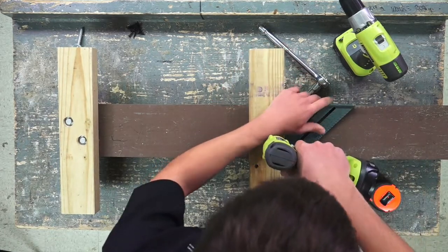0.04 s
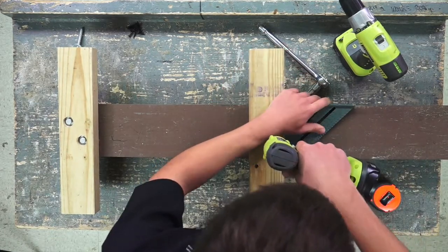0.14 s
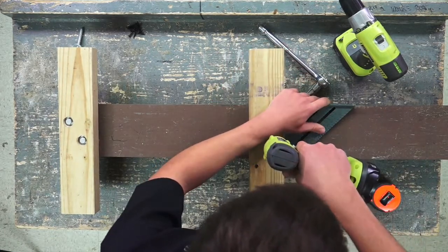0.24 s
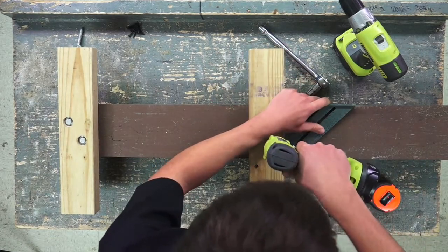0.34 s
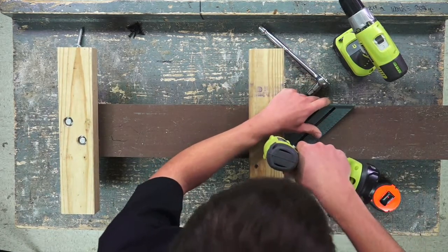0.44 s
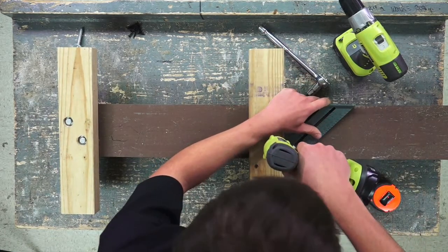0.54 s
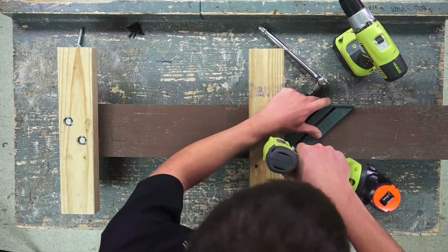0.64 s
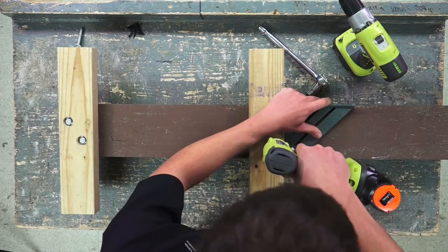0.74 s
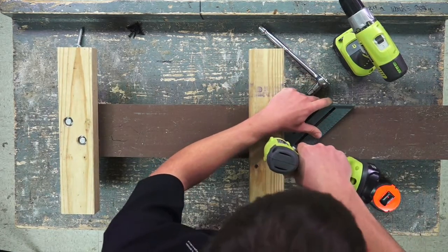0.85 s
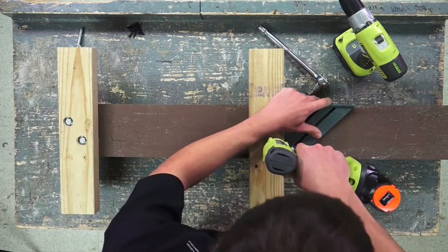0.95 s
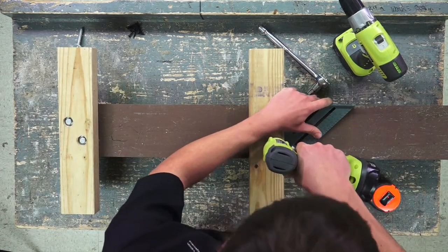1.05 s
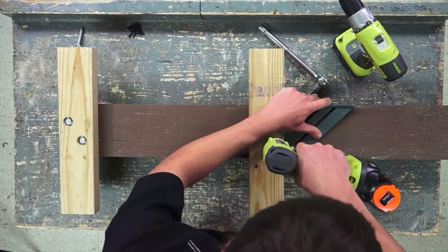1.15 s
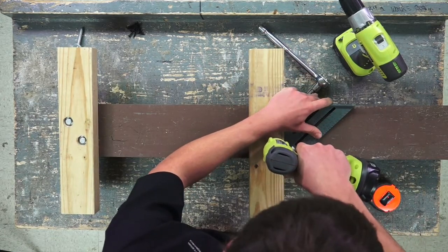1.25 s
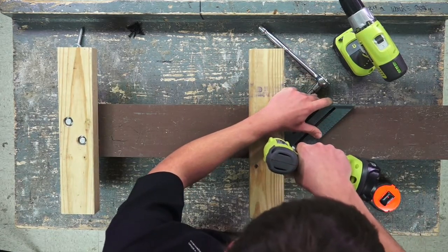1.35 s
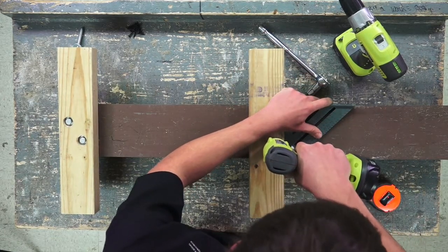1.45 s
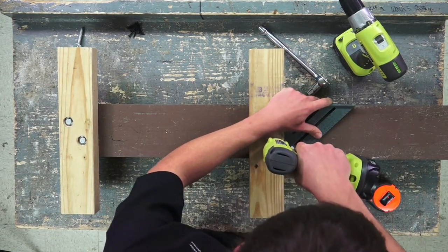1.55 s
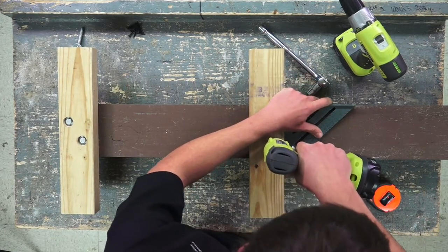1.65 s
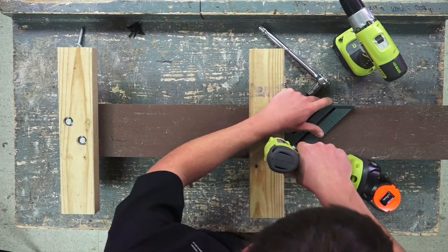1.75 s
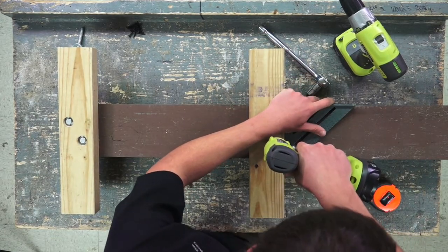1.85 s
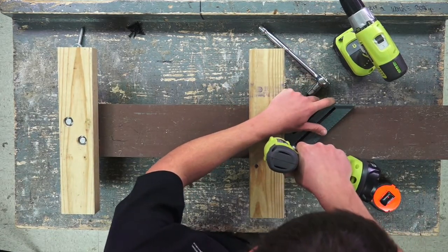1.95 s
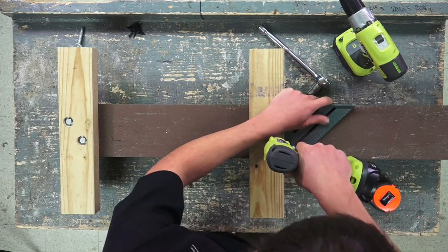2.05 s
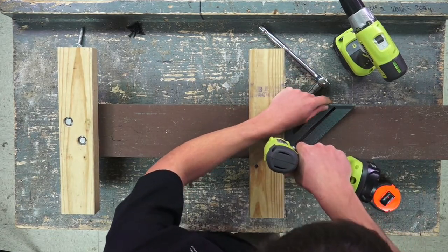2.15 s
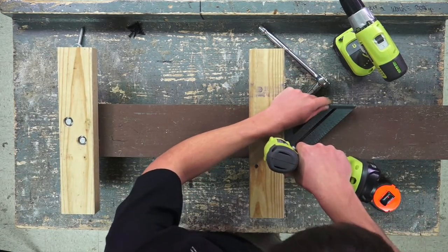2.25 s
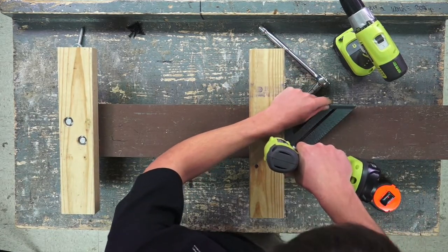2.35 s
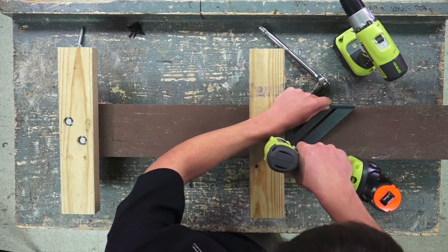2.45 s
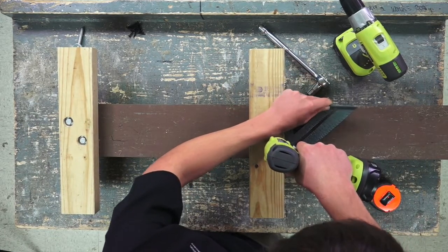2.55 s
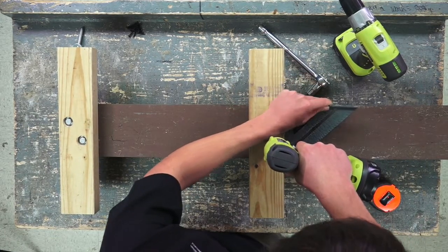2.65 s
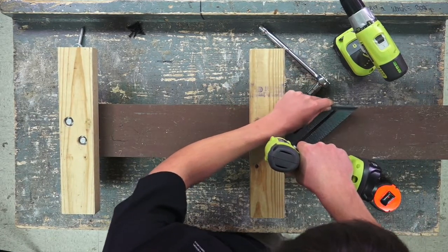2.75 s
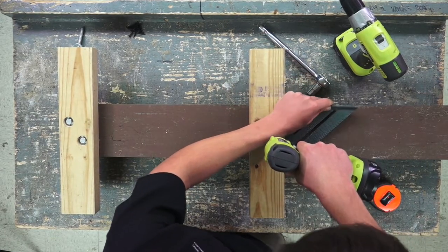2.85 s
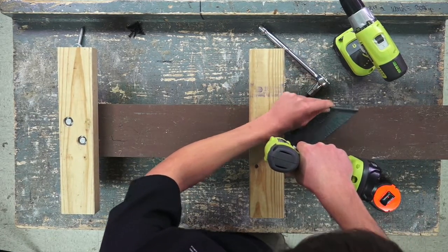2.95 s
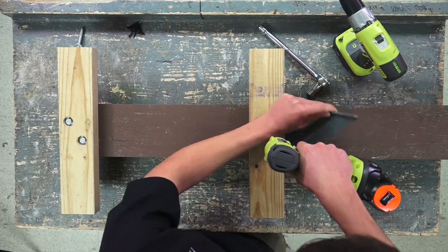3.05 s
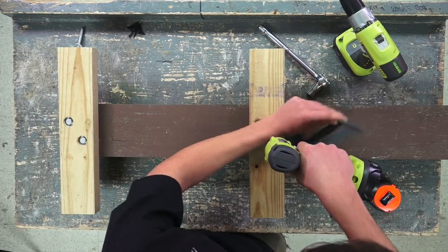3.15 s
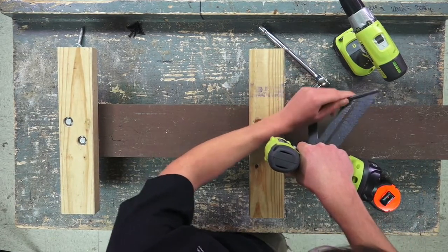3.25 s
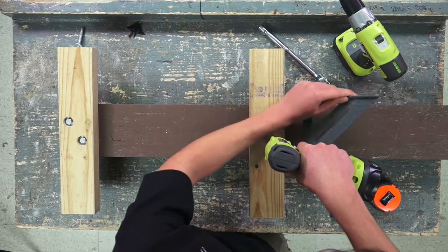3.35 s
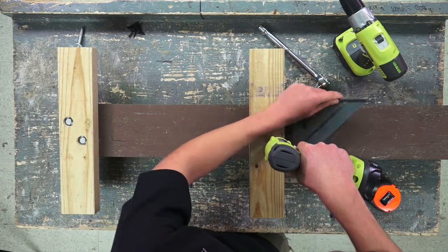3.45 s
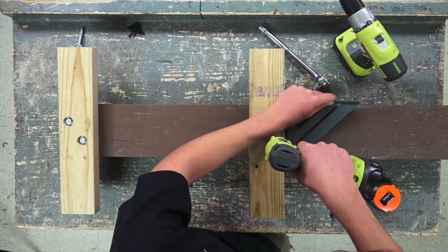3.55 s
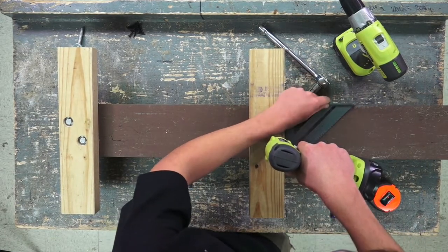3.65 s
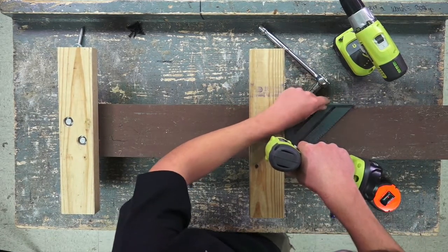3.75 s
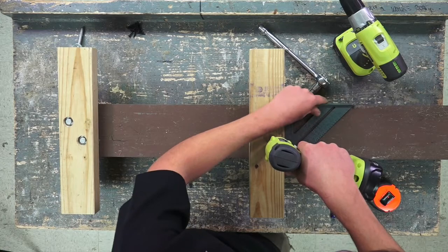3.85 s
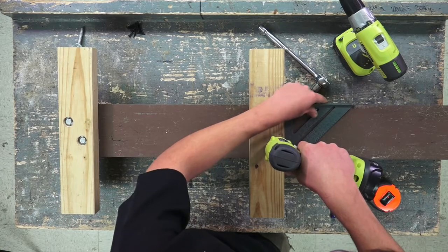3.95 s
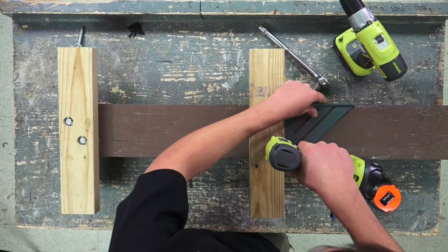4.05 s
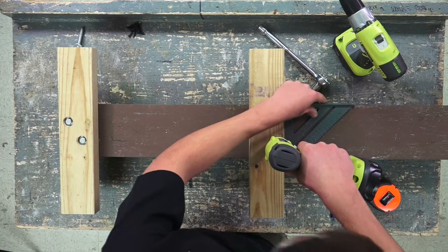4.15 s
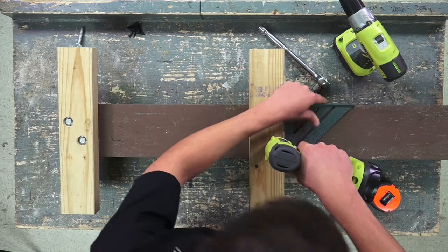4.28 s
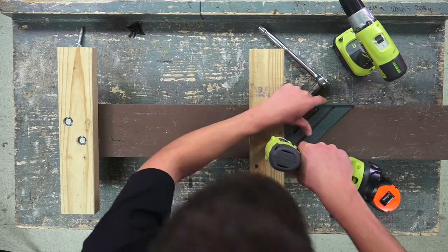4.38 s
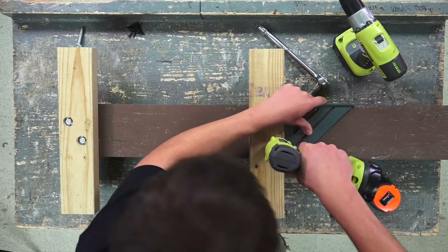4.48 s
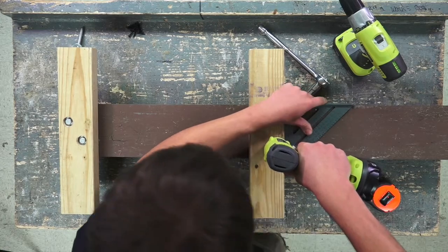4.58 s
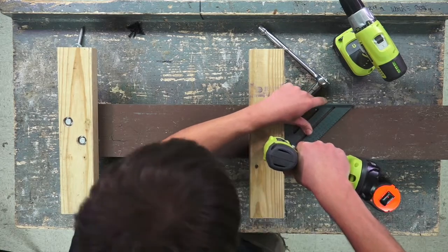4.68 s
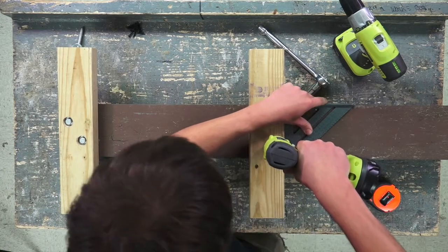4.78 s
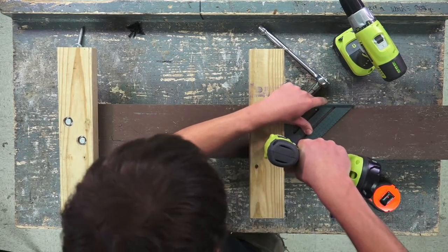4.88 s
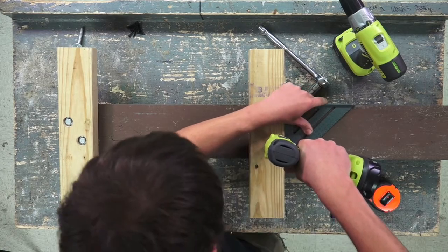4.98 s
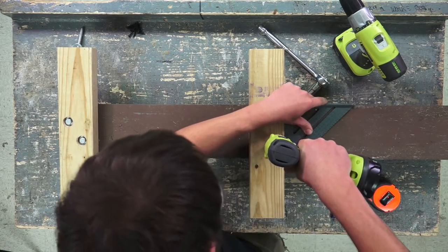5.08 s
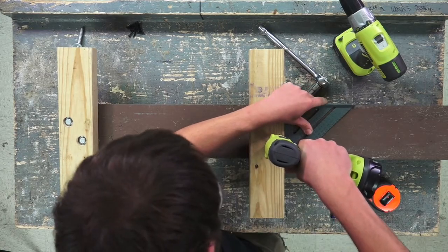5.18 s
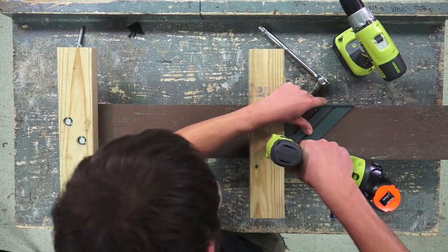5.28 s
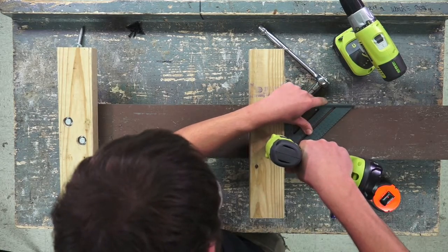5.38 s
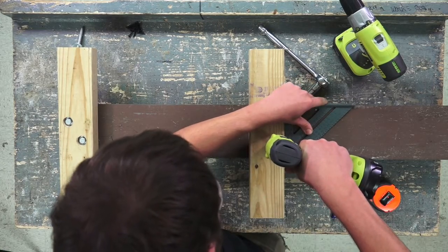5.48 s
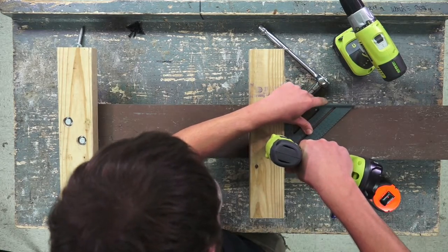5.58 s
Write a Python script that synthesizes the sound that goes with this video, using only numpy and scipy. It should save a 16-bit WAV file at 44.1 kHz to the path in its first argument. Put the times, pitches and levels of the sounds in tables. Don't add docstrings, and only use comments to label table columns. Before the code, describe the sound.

Two harsh, rapid impact-driver bursts on a workbench, separated by a quiet pause of soft sliding, light wood taps and a small metallic clink.

```python
import sys
import numpy as np
from scipy import signal
from scipy.fft import rfft, irfft, next_fast_len
from scipy.io import wavfile
from scipy.ndimage import uniform_filter1d

SR = 44100
rng = np.random.default_rng(int(sys.argv[2]) if len(sys.argv) > 2 else 0)


def boost_factor(decibels):
    exponent = np.asarray(decibels, float) / 20
    return 10 ** exponent


def log_audio(samples):
    frames = np.atleast_2d(samples).T
    limited = np.clip(frames, -1, 1)
    pcm = np.round(limited * 32767).astype(np.int16)
    wavfile.write(sys.argv[1], SR, pcm)


N = 247842

# time_s, blows_so_far
BLOW_COUNT = [
    [(.6934, 0), (.7712, 4), (.8263, 7), (1.0717, 20), (1.3586, 35), (1.554, 45), (1.712, 53), (1.7524, 55),
     (1.7749, 56)],
    [(4.5604, 0), (4.5808, 1), (4.887, 17), (4.9425, 20), (5.0187, 24), (5.3042, 39), (5.404, 44),
     (5.5227, 50), (5.6038, 54)],
]
# time_s, crack_peak_db, body_re_crack_db
SLOW_BLOWS = [
    (0.6596, -14.5, 2),
    (1.8061, -12, 3),
    (1.8338, -15, 14),
    (1.8613, -29, -9),
    (1.8823, -10, 8),
    (4.533, -16, 14.5),
]
# time_s, blow_force_db, bench_lean_db
EFFORT = [
    [(.66, -11, -6), (.71, 5.5, 9.5), (.78, -2.5, -5), (.95, 2.76, 5.5), (1.17, -1, 0.5), (1.3, -0.3, 5.5),
     (1.46, 3, -5), (1.76, 2.4, -2.5), (1.86, -1, 3.5)],
    [(4.53, -15, 2.5), (4.565, 6, 2.5), (4.63, -2.5, -4), (4.75, 2.3, -5), (4.87, -0.8, 2), (4.95, 0.5, 0),
     (5.2, -0.5, 2), (5.37, 1.5, -4), (5.62, 0.7, -5)],
]
# delay_s, crack_db, body_db
REBOUNDS = [
    (.002, -8, 1),
    (.0035, -15, 1),
    (.0085, -17, -8),
    (.0105, -14, -6),
    (.0132, -15, -3),
    (.0152, -11, -3),
    (.017, -16, -4),
]
# time_s, crack_peak_db, body_re_crack_db
LOOSE_CONTACTS = [(0.665, -19, -6), (0.6847, -7, 5), (0.6883, -26, 19), (0.7038, -19.5, 15.5),
                  (.708, -4, 4.5), (1.795, -16.5, 12.5), (1.843, -18, 11), (1.895, -25.5, 5),
                  (1.922, -20.5, 1), (1.937, -17.5, -2.5), (1.9497, -28.5, 4), (1.964, -31, 6),
                  (1.973, -42, 0), (4.5306, -30, 21.5), (4.542, -10.5, 11.5), (4.555, -7.5, 11)]
# freq_hz, density_db_per_hz
CRACK_SPECTRUM = [(1500, -34.5), (2500, -22.5), (3550, 6), (3900, -18), (4560, 2), (6100, -10), (7000, -6),
                  (9200, -9.5), (13500, -12.5), (15500, -12), (16500, -8.5)]
# freq_hz, density_db_per_hz
BODY_SPECTRUM = [(150, -44.5), (250, -17.5), (449, -23), (624, -16.5), (770, -14), (1070, -3), (1890, -6.5),
                 (2170, -6.5), (3500, -9.5), (3890, -10), (9000, -24.5), (11700, -44), (19800, -120)]
# freq_hz, width_hz, level_db
TOOL_MODES = [(630, 70, -10), (980, 80, -5), (1090, 65, 1.5), (1330, 110, -5), (1700, 120, -8),
              (2175, 85, 1.8), (2890, 100, -2), (3570, 110, 3), (4400, 150, -7), (4950, 350, -10),
              (5630, 120, -14), (6900, 250, -14), (9160, 300, -19)]
# freq_hz, width_hz, level_db
LEG_MODES = [
    (51.6, 20, -17),
    (108, 30, 1),
]
# freq_hz, width_hz, level_db
TOP_MODES = [(169.4, 35, 0), (197.3, 72, -2.5), (273.3, 40, -6), (299.5, 15, -11.5)]
# freq_hz, width_hz, level_db
BEAM_MODES = [(363.3, 12, -1), (412.5, 31, -20), (494.5, 8.6, -0.5), (664, 320, -6), (890, 370, -3.5),
              (930, 110, -0.5), (1090, 38, 2), (1370, 150, -4), (1590, 270, -19.5)]
# time_s, level_db
RUN = [
    [(.632, -70), (.645, -52), (.657, -41), (.68, -23.5), (.8, -27), (1.4, -21), (1.75, -18.5),
     (1.86, -26.5), (1.96, -44)],
    [(4.49, -68.5), (4.505, -48), (4.528, -31.5), (4.56, -22), (4.7, -21.5), (5.0, -17), (5.62, -18)],
]
# contact_s, step_up_s, whistle_end_s
TRIGGER = [
    (.588, .641, .659),
    (4.468, 4.498, 4.521),
]
# time_s, peak_db, thump_re_peak_db, ring_0_to_1
CLINKS = [
    (3.203, -51.5, -0.5, 0.6),
    (3.215, -38.5, -19, 0.43),
    (3.553, -29, -9.5, 0.3),
    (3.612, -32, -27, 0.45),
    (3.648, -46.5, -8, 0.8),
    (3.674, -51, -19, 1),
    (3.739, -57, -8, 0.6),
]
# freq_hz, level_db, t60_s
SQUARE_LAID = [(713, -7, 0.07), (1103, 9, 0.095), (1278, 2, .1), (1570, -4, 0.088), (1880, -3, .1),
               (2384, 0, 0.06), (3320, -8, 0.2), (3590, 1.5, 0.098), (4250, -2, 0.15), (4430, 2, .1),
               (4950, 7.5, 0.045), (5674, -3, 0.06), (6970, 1, 0.04), (9000, -9, 0.04)]
# freq_hz, level_db, t60_s
SQUARE_LIFTED = [(1028, -13, 0.6), (1352, 3, 0.049), (1610, -6, 0.17), (2300, -9.5, 0.12),
                 (2920, -7.5, 0.14), (3980, -14, 0.32), (4340, -5, 0.098), (5028, 1, 0.11), (5690, 0, 0.14),
                 (6800, -9, 0.086), (7140, -10, .12), (8000, -20, 0.086), (8662, -13, .08)]
# time_s, peak_db, pitch_hz
TAPS = [(0.105, -65, 1380), (0.296, -64, 851), (0.552, -63, 1110), (2.259, -53, 1237), (2.748, -63, 894),
        (3.037, -53.5, 1323), (3.171, -60.5, 797), (3.71, -56, 1050), (3.896, -60.5, 1145),
        (4.03, -49.5, 1243), (4.059, -58.5, 1023), (4.26, -61, 1030), (4.444, -55.5, 1090)]
# peak_s, rise_s, fall_s, hiss_db, scrape_db
STROKES = [(.01, .02, .07, -82, -80), (.11, .02, .04, -77, -83), (.346, 0.33, 0.12, -81, -80),
           (.62, .2, .03, -74, -75), (2.268, 0.044, 0.073, -69.5, -67), (2.62, 0.096, .09, -77, -85),
           (2.8, .07, .09, -74.5, -75.5), (2.97, 0.051, .1, -74, -88.5), (3.036, .02, .08, -78.5, -70),
           (3.2, .07, .02, -81, -66), (3.665, 0.029, 0.052, -68, -62.5), (3.716, 0.032, 0.1, -83, -53),
           (4.034, 0.043, .04, -68.5, -64.5), (4.24, .06, 0.16, -85, -80.5), (4.49, 0.15, .02, -69, -71)]
# freq_hz, density_db_per_hz
AIR_SPECTRUM = [(15, -52), (25, -23), (45, -10.5), (70, 0.5), (120, -9.5), (185, -12), (300, -25),
                (480, -29), (640, -32.5), (1740, -34.5), (2400, -42.5), (9000, -50.5), (16000, -52)]
# time_s, level_db
AIR_LEVEL = [(0, -66), (1.2, -60.5), (2.6, -64.5), (4.4, -63), (5.62, -62)]
# freq_hz, level_db
HUM = [(118.4, -75), (240.5, -79.5), (360.7, -88), (479.1, -89), (1437, -101.5), (1561, -99.5),
       (1680, -100), (1922, -98)]
# freq_hz, t60_s
ROOM_T60 = [(100, .36), (200, .45), (320, .62), (500, .5), (1100, .33), (3000, .31), (7000, .27),
            (14000, .17)]
# time_s, level_re_sound_db
APART = [(0.686, -28), (0.781, -44.5), (0.882, -22), (1.06, -27.5), (1.565, -27), (3.61, -24), (4.72, -19),
         (4.82, -42)]

CRACK_DB, CRACK_FOLLOWS = -11, .6
PUSH_DB = -14
CRACK_SCATTER_DB, PUSH_SCATTER_DB, JITTER_S = 1.3, 1.6, .00025
SETTLE_S = 0.12
CHIRP_HZ, IDLE_HZ, DRIVE_HZ, DRIFT_HZ, SLEW_S = 7200, 6250, 5700, 120, .004
IDLE_DB, DRIVE_DB, SWELL_DB, IDLE_OCTAVE_DB, DRIVE_OCTAVE_DB = -66, -55, 2.5, -72, -76
CONTACT_S = 0.000075
TICK_DB, TICK_T60_S = -10, .012
STROKE_RANGE_DB = 20
ROOM_DB, BENCH_ROOM_DB = -9.5, -10
TOP_HZ, EDGE_HZ = 15740, 180


def unit(x):
    return x / np.sqrt(np.mean(x ** 2) + 1e-20)


def along(points, hz):
    f, v = np.transpose(points)
    return np.interp(np.log(hz + 1), np.log(f + 1), v)


def level(tables, column=1):
    t = np.arange(N) / SR
    gain = 0
    for rows in tables:
        columns = np.transpose(rows)
        gain = gain + boost_factor(np.interp(t, columns[0], columns[column], -200, -200))
    return gain


def filtered(x, response):
    m = next_fast_len(N + SR // 2)
    return irfft(rfft(x, m) * response(np.fft.rfftfreq(m, 1 / SR)), m)[..., :N]


def modes(table):
    def response(f):
        total = 0
        for k, (centre_hz, width_hz, db) in enumerate(table):
            damping = 1j * f * width_hz
            total = total + (-1) ** k * boost_factor(db) * damping / (centre_hz ** 2 - f * f + damping)
        return total
    return response


def noise(spectrum):
    return unit(filtered(rng.standard_normal(N), lambda hz: boost_factor(along(spectrum, hz))))


def band(lo_hz, hi_hz):
    return [(lo_hz / 2, -30), (lo_hz, 0), (hi_hz, -6), (hi_hz * 2, -36)]


def spikes(s, db):
    return np.bincount(np.clip(np.round(s * SR).astype(int), 0, N - 1), boost_factor(db), N)


def dying(x, t60):
    return signal.lfilter([1], [1, -boost_factor(-60 / (t60 * SR))], x)


def steady(x):
    return x / np.sqrt(np.abs(uniform_filter1d(x ** 2, size=4000)) + 1e-9)


def blows():
    bursts = []
    for rows in BLOW_COUNT:
        count_s, count = np.transpose(rows)
        bursts.append(np.interp(np.arange(rows[-1][1] + 1), count, count_s))
    s = np.concatenate(bursts)
    luck = rng.standard_normal((len(s), 3))
    force_db = np.interp(s, *np.concatenate(EFFORT).T[:2])
    crack_db = CRACK_DB + CRACK_FOLLOWS * force_db + CRACK_SCATTER_DB * luck[:, 1]
    push_db = PUSH_DB + force_db + PUSH_SCATTER_DB * luck[:, 2]
    slow_s, slow_db, body_db = np.transpose(SLOW_BLOWS)
    rows = np.c_[[s + JITTER_S * luck[:, 0], crack_db, push_db], [slow_s, slow_db, slow_db + body_db]]
    return rows[:, np.argsort(rows[0])]


def hammer(s, crack_db, push_db):
    luck = rng.standard_normal((len(s), 2, len(REBOUNDS)))
    lag_s, lag_crack_db, lag_body_db = np.transpose(REBOUNDS)
    gap_s = np.diff(s, append=s[-1] + .02)[:, None]
    slack_db = np.where((gap_s > .0235) & (lag_s > .007), -18, 0)
    rebound_s = s[:, None] + lag_s * np.minimum(gap_s, .021) / .019 + .0004 * luck[:, 0]
    mean_crack_db = uniform_filter1d(crack_db, size=3)[:, None] + slack_db
    mean_push_db = uniform_filter1d(push_db, size=3)[:, None] + slack_db
    rebound_crack_db = mean_crack_db + lag_crack_db + 2 * luck[:, 1]
    rebound_push_db = mean_push_db + lag_body_db + 1.2 * luck[:, 1]

    loose_s, loose_db, loose_body_db = np.transpose(LOOSE_CONTACTS)
    times_s = np.r_[s, loose_s, rebound_s.ravel()]
    cracks_db = np.r_[crack_db, loose_db, rebound_crack_db.ravel()]
    pushes_db = np.r_[push_db, loose_db + loose_body_db, rebound_push_db.ravel()]

    contact = spikes(times_s + .0007, cracks_db)
    snap = dying(contact, t60=.006) - dying(contact, t60=.003)
    clatter = boost_factor(-10) * dying(spikes(times_s + .001, pushes_db), t60=0.014) * noise(BODY_SPECTRUM)
    grit = 1 + .45 * rng.standard_normal(N)
    drive = dying(spikes(times_s + .0014, pushes_db), t60=0.0029) * grit
    ring = boost_factor(11.5) * filtered(drive, modes(TOOL_MODES))
    return boost_factor(10.0) * snap * noise(CRACK_SPECTRUM) + clatter + ring


def shake(rest_db, mean_db, force_share, lean_share):
    tables = []
    for rows in EFFORT:
        gains = [(s, mean_db + force_share * force + lean_share * lean) for s, force, lean in rows]
        last_s, last_db = gains[-1]
        tables.append(gains + [(last_s + SETTLE_S, last_db + rest_db)])
    return level(tables)


def bench(s):
    even_s = uniform_filter1d(s, size=3)
    s = np.where(np.abs(even_s - s) < .0008, even_s, s)
    blow = spikes(s + 0.00193, 1.5 * rng.standard_normal(len(s)))
    recoil = spikes(s + .0118, 2.5 * rng.standard_normal(len(s)))
    legs = steady(filtered(blow + 0.53 * recoil, modes(LEG_MODES)))
    top = steady(filtered(blow + 0.24 * recoil, modes(TOP_MODES)))
    beam = steady(filtered(blow + 0.57 * recoil, modes(BEAM_MODES)))
    out = shake(rest_db=-10, mean_db=-34, force_share=.1, lean_share=0.86) * legs
    out += shake(rest_db=-5, mean_db=-34.5, force_share=1, lean_share=.2) * top
    return out + shake(rest_db=-20, mean_db=-25, force_share=1, lean_share=0.027) * beam


def motor():
    resonant = unit(filtered(rng.standard_normal(N), modes(TOOL_MODES)))
    return boost_factor(-2) * level(RUN) * unit(noise(BODY_SPECTRUM) + .5 * resonant)


def whistle():
    t = np.arange(N) / SR
    steps = []
    for on_s, up_s, off_s in TRIGGER:
        steps.append([
            (on_s, CHIRP_HZ, IDLE_DB - 7.5, IDLE_OCTAVE_DB - 7.5),
            (on_s + SLEW_S, IDLE_HZ, IDLE_DB, IDLE_OCTAVE_DB),
            (up_s - SLEW_S, IDLE_HZ + DRIFT_HZ, IDLE_DB + SWELL_DB, IDLE_OCTAVE_DB + SWELL_DB),
            (up_s + SLEW_S / 2, DRIVE_HZ, DRIVE_DB, DRIVE_OCTAVE_DB),
            (off_s, DRIVE_HZ + DRIFT_HZ, DRIVE_DB - 1, DRIVE_OCTAVE_DB - 6)])
    s, hz = np.concatenate(steps).T[:2]
    phase = 2 * np.pi * np.cumsum(np.interp(t, s, hz)) / SR
    tone = level(steps, column=2) * np.sin(phase)
    octave = level(steps, column=3) * np.sin(2 * phase)
    return boost_factor(1.0) * (tone + octave)


def square():
    out = np.zeros(N + SR)
    t = np.arange(SR // 3) / SR
    s, db, thump_db, ring = np.transpose(CLINKS)
    luck = rng.standard_normal((len(s), len(SQUARE_LAID), 2))
    build = 1 - np.exp(-t / CONTACT_S)
    for i in range(len(s)):
        table = SQUARE_LIFTED if s[i] < 3.4 else SQUARE_LAID
        tones = 0
        for k, (hz, mode_db, t60) in enumerate(table):
            decay = boost_factor(mode_db + 2.15 * luck[i, k, 0] - 60 * t / t60)
            tones = tones + decay * np.sin(2 * np.pi * hz * (1 + 0.0039 * luck[i, k, 1]) * t)
        thump = boost_factor(thump_db[i] - 60 * t / 0.15) * np.sin(2 * np.pi * 110 * t)
        out[round(s[i] * SR):][:len(t)] += boost_factor(db[i]) * (0.34 * ring[i] * tones * build + thump)
    contact = spikes(s, db)
    edge = 0.21 * noise(band(2420, 10100)) * dying(contact, t60=0.03)
    chatter = 0.14 * noise(band(330, 6000)) * dying(contact, t60=0.2)
    return out[:N] + edge + chatter


def strokes(column):
    tables = []
    for row in STROKES:
        peak_s, rise_s, fall_s = row[:3]
        far_db = row[column] - 2 * STROKE_RANGE_DB
        tables.append([(peak_s - 2 * rise_s, far_db), (peak_s, row[column]), (peak_s + 2 * fall_s, far_db)])
    return level(tables)


def handling():
    out = np.zeros(N + SR)
    t = np.arange(SR // 10) / SR
    for s, db, hz in TAPS:
        rough = uniform_filter1d(rng.standard_normal(len(t)), size=3)
        knock = 0.67 * np.sin(2 * np.pi * hz * t) + 0.17 * rough
        tick = boost_factor(TICK_DB - 60 * t / TICK_T60_S) * rng.standard_normal(len(t))
        out[round(s * SR):][:len(t)] += boost_factor(db) * (boost_factor(-60 * t / 0.035) * knock + tick)
    grain = boost_factor(3.6 * unit(uniform_filter1d(rng.standard_normal(N), size=150)))
    hiss = strokes(column=3) * unit(grain * noise(band(1200, 7000)))
    scrape = boost_factor(4.5) * strokes(column=4) * unit(grain * noise(band(240, 820)))
    return out[:N] + hiss + scrape


def room(x):
    hz, _, z = signal.stft(rng.standard_normal(SR * 2 // 3), SR, nperseg=256)
    t = _
    decay = boost_factor(-60 * t / along(ROOM_T60, hz)[:, None])
    tail = signal.istft(z * decay, SR, nperseg=256)[1]
    delayed = np.pad(x, (260, 0))
    return signal.fftconvolve(delayed, tail / np.linalg.norm(tail))[:N]


def workshop():
    t = np.arange(N) / SR
    hum = sum(boost_factor(db + 8.0) * np.sin(2 * np.pi * hz * t + k) for k, (hz, db) in enumerate(HUM))
    return level([AIR_LEVEL]) * noise(AIR_SPECTRUM) + hum


def scene():
    struck = blows()

    def low_cut(f):
        return (1j * f / (48 + 1j * f)) ** 3

    near = filtered(hammer(*struck) + motor() + whistle() + square() + handling(), low_cut)
    wood = filtered(bench(struck[0]), low_cut)
    stir = unit(uniform_filter1d(rng.standard_normal(N), size=900))
    walls = room(boost_factor(ROOM_DB) * near + boost_factor(BENCH_ROOM_DB) * stir * wood)
    mono = near + wood + walls + workshop()
    return np.array([mono, mono])


def top_cut(x):
    return signal.sosfilt(signal.butter(12, 16680, fs=SR, output="sos"), x)


def record(dry):
    t = np.arange(N) / SR
    clipped = dry / (1 + np.abs(dry) ** 6) ** (1 / 6)
    apart = sum(boost_factor(db) * np.clip(1.5 - np.abs(t - s) / .018, 0, 1) for s, db in APART)
    difference = apart * np.roll(clipped[0], 97) * [[1], [-1]]

    def band_limit(hz):
        return np.cos(np.pi / 2 * np.clip((hz - TOP_HZ) / EDGE_HZ, 0, 1)) ** 2

    mix = filtered(clipped + difference, band_limit)
    return top_cut(mix)


dry = scene()
out = record(dry)
log_audio(out)
```